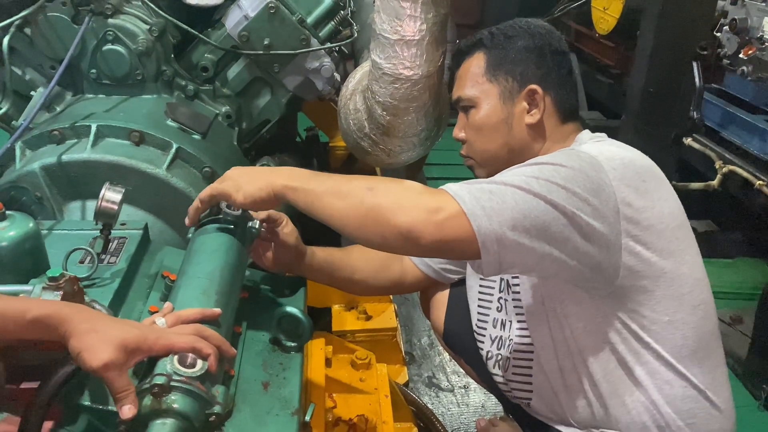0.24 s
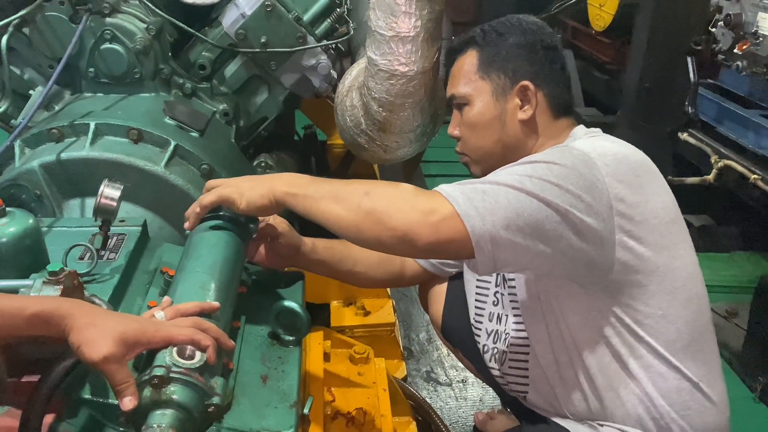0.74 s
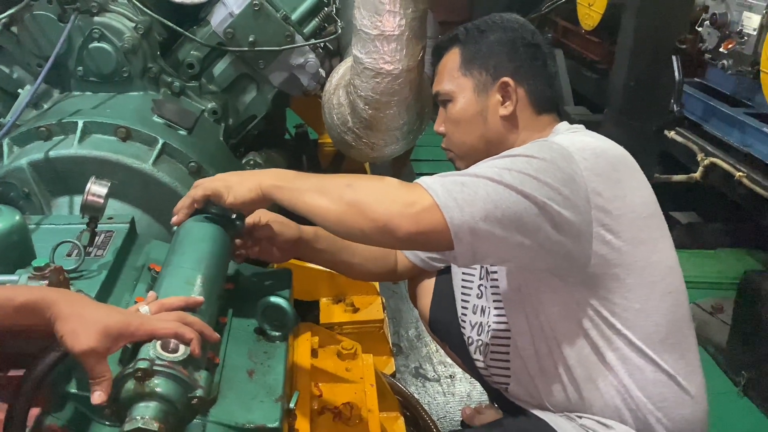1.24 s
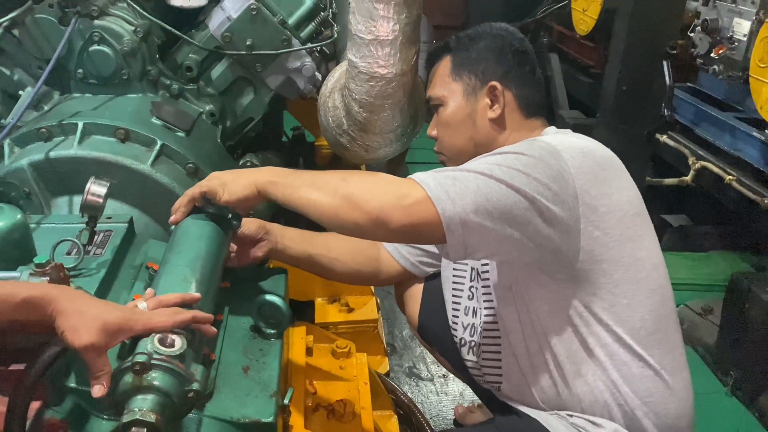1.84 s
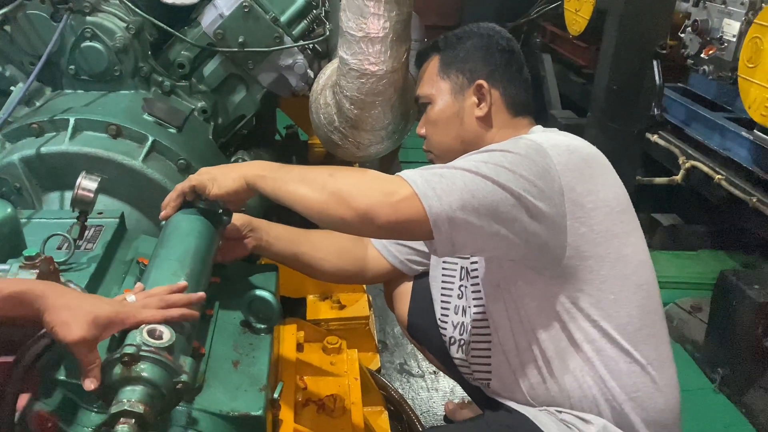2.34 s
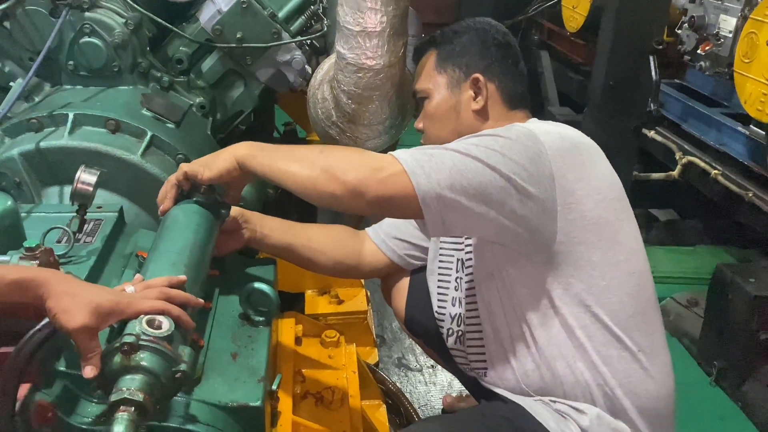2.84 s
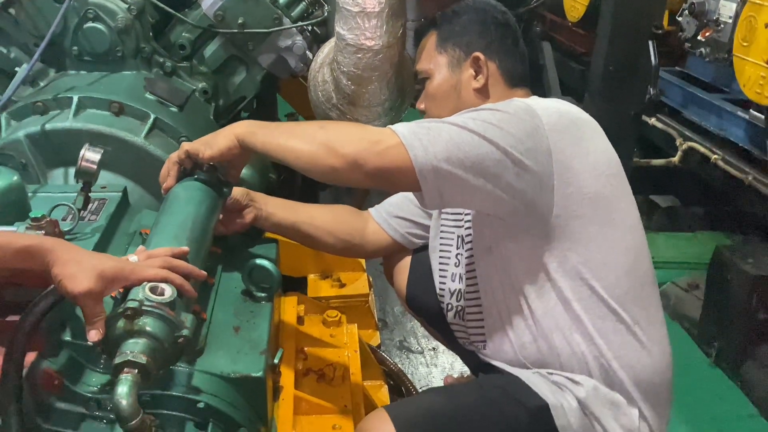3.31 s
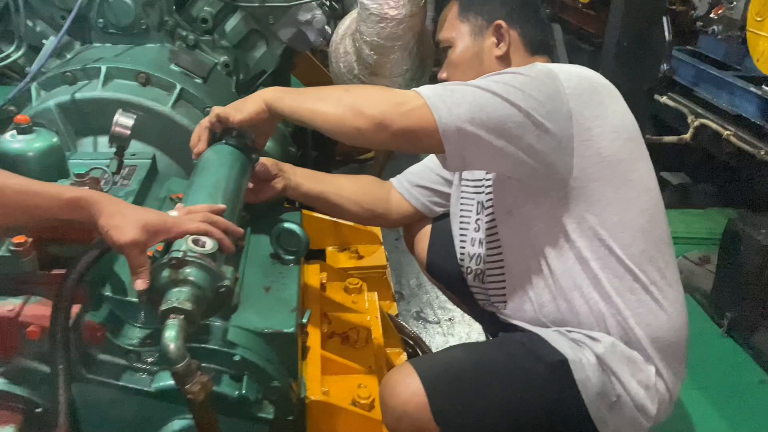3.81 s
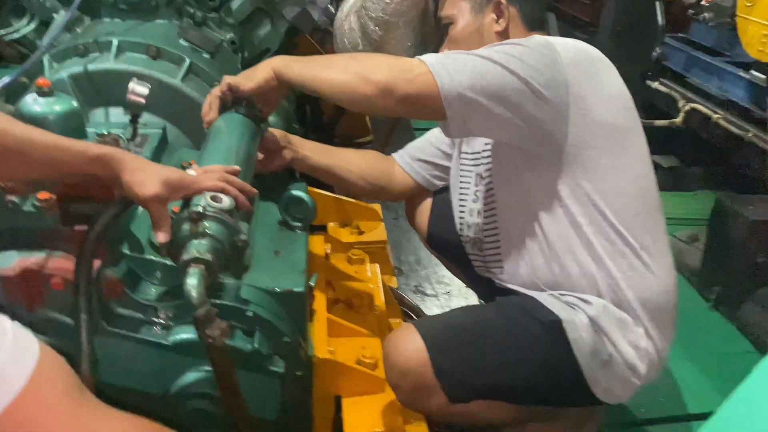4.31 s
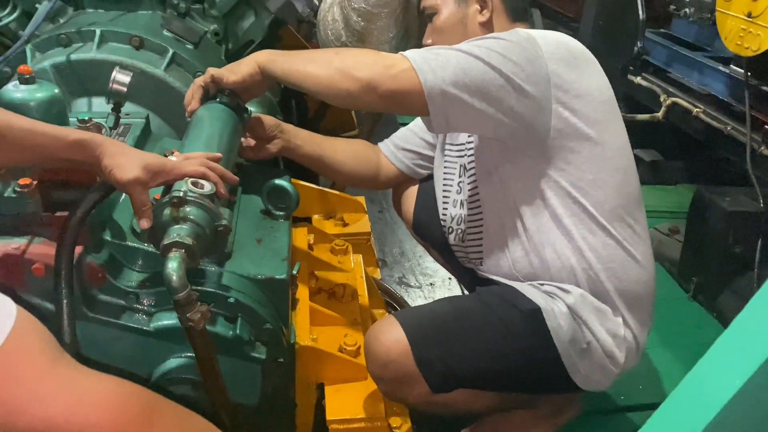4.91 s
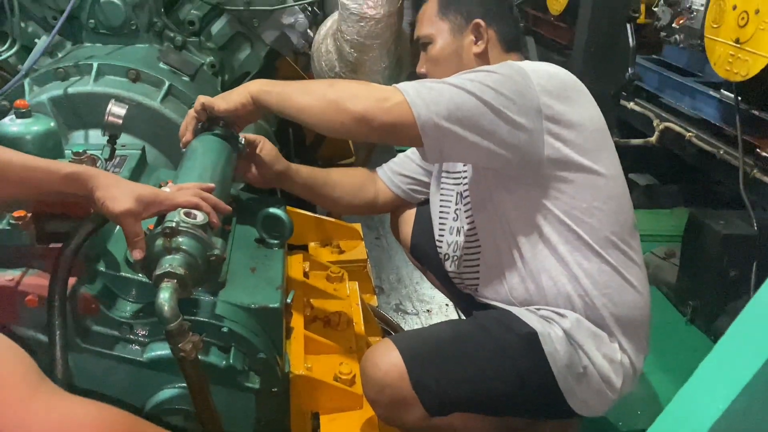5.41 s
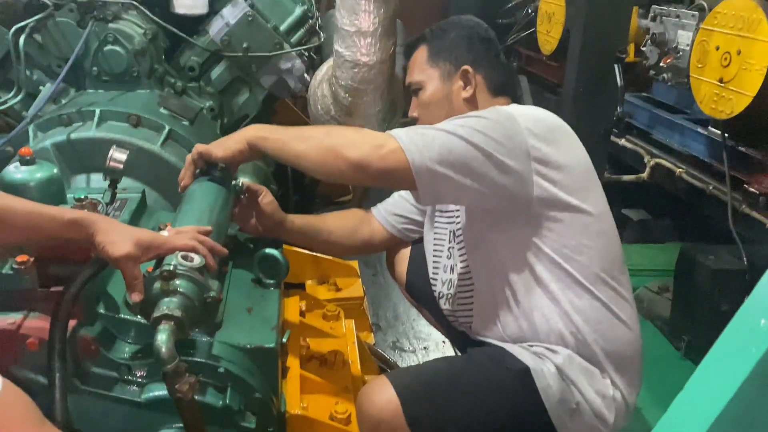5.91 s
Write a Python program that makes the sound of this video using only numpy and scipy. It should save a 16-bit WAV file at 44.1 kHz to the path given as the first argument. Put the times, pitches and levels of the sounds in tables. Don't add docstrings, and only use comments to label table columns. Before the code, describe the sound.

Constant close machinery roar: fast diesel thumping below, a piercing gear whine near eight hundred hertz, motor hum and ventilation noise, slightly dulling midway.

```python
import sys
import numpy as np
from scipy import signal
from scipy.fft import rfft, irfft, next_fast_len
from scipy.io import wavfile

SR = 44100
rng = np.random.default_rng(int(sys.argv[2]) if len(sys.argv) > 2 else 0)


def undo_db(level):
    steps = np.asarray(level, float) / 20
    return 10 ** steps


def dump_mix(stems):
    frames = np.atleast_2d(stems).T
    limited = np.clip(frames, -1, 1)
    pcm = np.round(limited * 32767).astype(np.int16)
    wavfile.write(sys.argv[1], SR, pcm)


N = 271215

# (time [s], firing cycle rate [Hz])
SPEED = [(0, 12.29), (.5, 12.276), (1, 12.262), (2, 12.272), (2.5, 12.284), (4.5, 12.285), (5, 12.295),
         (6.15, 12.296)]
# (time [s], progress [0-1])
MOVE = [
    (0, 0.089),
    (2.4, 0.039),
    (3.4, 0.78),
    (6.15, 0.82),
]
CYCLE_HZ = SPEED[0][1]
LINE_STEP, CONTROL_STEP = 8, 64


def in_time(rows):
    time_s, *columns = np.transpose(rows)
    return [np.interp(np.arange(N) / SR, time_s, column) for column in columns]


def at_hz(points, hz, column=1):
    points = np.array(points)
    return np.interp(np.log(hz), np.log(points[:, 0]), points[:, column])


def at_control_rate(curve):
    held = np.append(curve[::CONTROL_STEP], [curve[-1]] * 2)
    return held[:N // CONTROL_STEP + 2]


def drift(rate_hz, count):
    r = np.exp(-2 * np.pi * rate_hz * CONTROL_STEP / SR)
    noise = rng.standard_normal((count, N // CONTROL_STEP + 1502))
    wander = signal.lfilter([1], [1, -2 * r, r * r], noise)[:, 1500:]
    return wander / np.sqrt((1 + r * r) / (1 - r * r) ** 3)


def tones(turns, left_db, right_db, lead_rad, wander_db, wander_hz):
    wander = wander_db * drift(wander_hz, count=2 * len(turns))
    at = np.arange(0, N, LINE_STEP) / CONTROL_STEP
    out = np.zeros((2, len(at)))
    for k, turn in enumerate(turns):
        for side, db in enumerate((left_db[k], right_db[k])):
            gain = np.sqrt(2) * undo_db(db + wander[2 * k + side])
            wave = np.cos(2 * np.pi * turn - side * lead_rad[k])
            out[side] += np.interp(at, np.arange(len(gain)), gain) * wave
    return out


def engine(cycles):
    # (order, level [dB])
    low_orders = [(4, -40.5), (5, -43.5), (6, -41.5), (7, -44), (8, -42), (9, -43.5), (10, -51),
                  (11, -45.5), (12, -38), (13, -43.5), (14, -35.5), (15, -31), (16, -40), (17, -46.5),
                  (18, -45.5), (19, -40), (20, -44), (24, -45.5), (25, -37.5), (26, -42), (27, -42.5),
                  (28, -48), (32, -51)]
    # (frequency [Hz], delay [cycles])
    arrival = [(61, .73), (86, .92), (98, .68), (123, .62), (138, .88), (184, .6), (245, .92), (345, 1.98)]
    room_nodes_hz = [68, 178, 215, 227]
    order_shift = {8: 3, 17: 2.5, 19: -2, 25: 7, 26: -6, 27: 6, 28: 4, 32: 7}
    # (frequency [Hz], left minus right [dB])
    engine_pan = [(120, -3), (140, -5.5), (185, -0.5), (215, 1), (300, 2), (330, -4.5)]

    order = np.arange(3, 33)
    hz = order * CYCLE_HZ
    move = at_control_rate(in_time(MOVE)[0])
    weak_order_db = -63.5
    level_db = dict(low_orders)
    base_db = [[level_db.get(k, weak_order_db)] for k in order]
    db = np.outer([order_shift.get(k, 0) for k in order], move - 0.5) + base_db
    half_pan_db = at_hz(engine_pan, hz)[:, None] / 2
    lag_turns = np.cumsum(at_hz(arrival, hz)) + sum((hz > node) / 2 for node in room_nodes_hz)
    lead_rad = 0.0027 * hz - 0.1
    turns = [k * cycles - lag for k, lag in zip(order, lag_turns)]
    return tones(turns, db + half_pan_db, db - half_pan_db, lead_rad, wander_db=1.16, wander_hz=0.71)


def clatter(cycles):
    # (frequency [Hz], level [dB])
    upper_orders = [(400, -64.5), (600, -52.5), (850, -46), (1000, -63), (1200, -52.5), (1400, -64.5),
                    (1800, -58)]
    order = np.arange(33, 130)
    chance = rng.standard_normal((len(order), 4))
    db = at_hz(upper_orders, order * CYCLE_HZ)
    uneven_db = 2.5 * chance[:, 1:3].T
    left_db, right_db = db + uneven_db[0], db - 7.0 + uneven_db[1]
    turns = [k * cycles + start for k, start in zip(order, chance[:, 0])]
    return tones(turns, left_db, right_db, 1.83 * chance[:, 3], wander_db=5.0, wander_hz=0.33)


def pump(cycles):
    # (order, left at first [dB], right at first [dB], left at last [dB], right at last [dB])
    shaft_orders = [(4, -47.8, -45.3, -47.5, -44.1), (5, -43.4, -40.0, -50.3, -44.5),
                    (6, -43.7, -39.4, -49.4, -40.9), (7, -46.5, -45.4, -45.0, -42.4),
                    (8, -41.6, -42.2, -38.0, -43.6), (9, -48, -40.5, -31.5, -36.5),
                    (10, -18.0, -23.3, -21.6, -30.9), (11, -37, -35, -37, -40),
                    (12, -38.8, -40.2, -35.0, -41.5), (13, -47.5, -45.9, -50, -53.0),
                    (14, -48.0, -53.4, -50.2, -50.5), (18, -53.6, -56.1, -50.3, -56.8),
                    (21, -47.7, -50.4, -52.3, -46.2), (22, -55.2, -49.7, -54.3, -50.8)]
    # (time [s], left level [dB], right level [dB], left lead [rad])
    whine = [
        (0, -18, -23, .3),
        (1.9, -18.3, -24, .3),
        (3.5, -20, -33, .3),
        (4.2, -22, -29, 1.5),
        (4.7, -23, -31, 2.1),
        (5.5, -22, -33, 2.3),
        (6.15, -27, -36, 2.3),
    ]
    # (order, offset [cycle rates], left at first [dB], left at last [dB])
    side_lines = [(9, 1, -44, -45), (10, -3, -42, -49), (10, -1, -45, -39), (10, 1, -35, -44),
                  (10, 2, -43, -38), (11, -1, -39, -46), (11, 1, -42, -35), (12, -2, -43, -43),
                  (12, -1, -43, -41), (10, 3, -42, -46), (11, -2, -43, -46)]

    order, left_db, right_db, last_left_db, last_right_db = np.transpose(shaft_orders)[:, :, None]
    order = order[:, 0]
    move = at_control_rate(in_time(MOVE)[0])
    left_db = left_db + move * (last_left_db - left_db)
    right_db = right_db + move * (last_right_db - right_db)
    mesh = order == 10
    mesh_left_db, mesh_right_db, mesh_lead_rad = in_time(whine)
    left_db[mesh] = at_control_rate(mesh_left_db)
    right_db[mesh] = at_control_rate(mesh_right_db)

    shake = 0.001 * drift(0.91, count=1)[0]
    at = np.arange(0, N, LINE_STEP) / CONTROL_STEP
    shaft = 6.4464 * cycles + np.interp(at, np.arange(len(shake)), shake)
    start = rng.random(len(order))
    lead_rad = [mesh_lead_rad[::LINE_STEP] if k == 10 else 0.28 * (k - 6.0) for k in order]
    turns = [k * shaft + p for k, p in zip(order, start)]
    lines = tones(turns, left_db, right_db, lead_rad, wander_db=0.8, wander_hz=1.5)

    strong = {(k, j): first_db + move * (last_db - first_db) for k, j, first_db, last_db in side_lines}
    pairs = [(k, j) for k in range(6, 15) for j in (-3, -2, -1, 1, 2, 3)]
    db = np.array([strong.get((k, j), -45 - 2.9 * abs(k - 10) - 1.4 * abs(j) + 0 * move) for k, j in pairs])
    chance = rng.standard_normal((len(pairs), 2))
    turns = [k * shaft + j * cycles + p for (k, j), p in zip(pairs, chance[:, 0])]
    return lines + tones(turns, db, db - 4.5, 1.5 * chance[:, 1], wander_db=2.2, wander_hz=0.6)


def motors():
    # (frequency [Hz], left level [dB], right level [dB])
    hums = [(88.4, -57, -55), (204, -53.5, -42), (376, -59, -49.5), (419.5, -46, -68), (465, -46.5, -49),
            (1418, -45.5, -54), (1002, -48, -56)]
    hz, left_db, right_db = np.transpose(hums)
    turns = hz[:, None] * np.arange(0, N, LINE_STEP) / SR
    return tones(turns, left_db, right_db, hz / 700, wander_db=2.0, wander_hz=0.58)


def ripple(hz, width_hz):
    knots_hz = np.arange(0, SR / 2 + 2 * width_hz, width_hz)
    return np.interp(hz, knots_hz, 1.9 * rng.standard_normal(len(knots_hz)))


def coloured(spectrum, low_hz, high_hz, lag_s, ripple_db):
    # (frequency [Hz], width [Hz], level above the noise [dB])
    casing = [(600, 50, 5), (822, 40, 6), (930, 30, 7), (1110, 40, 7), (1195, 40, 6), (1435, 30, 5),
              (1660, 50, 3.5), (1750, 50, 3.5), (2150, 90, 2.5), (2520, 60, 3), (2635, 70, 4.5),
              (3010, 70, 4), (3410, 60, 3), (4290, 80, 4)]
    size = next_fast_len(N)
    hz = np.arange(size // 2 + 1) * SR / size + 1e-3
    mid, side = rfft(rng.standard_normal((2, size)))
    alike = np.clip(at_hz(spectrum, hz, column=3), -1, 1)
    resonance_db = sum(top_db / (1 + (2 * (hz - at) / width) ** 2) for at, width, top_db in casing)
    db = at_hz(spectrum, hz) + resonance_db
    gain = np.sqrt(SR / 4) * undo_db(db) * (hz >= low_hz) * (hz < high_hz)
    pan = undo_db(at_hz(spectrum, hz, column=2) / 2)
    echoing = hz < 8000
    room_left, room_right = [undo_db(ripple_db * echoing * ripple(hz, 45)) for _ in range(2)]
    late = np.exp(-2j * np.pi * lag_s * echoing * (hz + 500 * ripple(hz, 110)))
    mid, side = np.sqrt(1 + alike) * mid, np.sqrt(1 - alike) * side
    left = (mid + side) * pan * room_left
    right = (mid - side) / pan * late * room_right
    return irfft(gain * np.array([left, right]), size)[:, :N]


def ports():
    # (frequency [Hz], density [dB per Hz])
    top_hiss = [(9200, -89), (10600, -91.5), (12500, -92), (13100, -100.5), (14500, -98.5), (15500, -101)]
    hz = np.arange(9200, 15600, 300)
    agree_hz, agree_every_hz = 10230, 3950
    alike = np.clip(1.2 * np.cos(2 * np.pi * (hz - agree_hz) / agree_every_hz), -0.96, 0.96)
    return list(zip(hz, at_hz(top_hiss, hz), 0 * hz, alike))


def air(cycles):
    # (frequency [Hz], density [dB per Hz], left minus right [dB], left-right likeness [-1 to 1])
    rumble = [(32, -79, 1, .7), (48, -67, -2, .95), (110, -64, 0, 0.71), (276, -64.5, 4, 0.53),
              (530, -67, -7, 0.69), (603, -61, 0.5, 0.66), (920, -59.5, 1, 0.16), (1070, -71, -7, .1)]
    hiss_bands = [(1200, -67, 2, 0.7), (1460, -64.5, 0, 0.72), (2040, -65, 1.5, 0.98),
                  (2610, -69, -0.5, 0.038), (3240, -71, 2.5, -0.67), (4870, -75.5, 3.5, 0.88),
                  (6350, -82, 4, 0.6), (7500, -90, 3.5, -0.51)]
    split_hz, top_hz = 1040, 15750
    move, = in_time(MOVE)
    passing_rad = np.pi / 2 * np.arange(N) / N
    throb_db = 0.46 * np.cos(2 * np.pi * (cycles - 0.4))
    sink_db = 1.8 * (0.5 - move)
    first, last = (coloured(rumble[-1:] + hiss_bands + ports(), split_hz, top_hz, lag_s=0.000601, ripple_db=1.2)
                   for _ in range(2))
    hiss = np.cos(passing_rad) * first + np.sin(passing_rad) * last
    hiss = hiss * undo_db(sink_db + throb_db)
    return coloured(rumble, 15, split_hz, lag_s=0, ripple_db=0) + hiss


def scene():
    cycle_hz, = in_time(SPEED)
    cycles = 0.04 + np.cumsum(cycle_hz) / SR
    coarse = cycles[::LINE_STEP]
    lines = engine(coarse) + clatter(coarse) + pump(coarse) + motors()
    lines = signal.resample_poly(lines, LINE_STEP, 1, axis=1, padtype="line")[:, :N]
    return lines + air(cycles)


def top_cut(x):
    return signal.sosfilt(signal.butter(12, 16350, fs=SR, output="sos"), x)


def record(dry):
    return top_cut(dry)


dry = scene()
out = record(dry)
dump_mix(out)
```